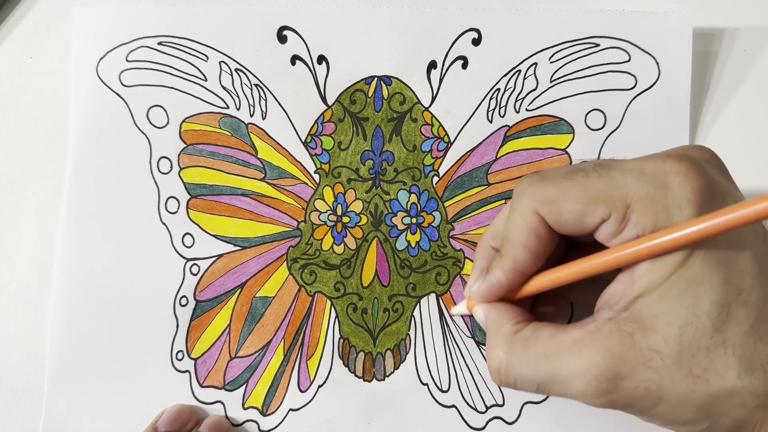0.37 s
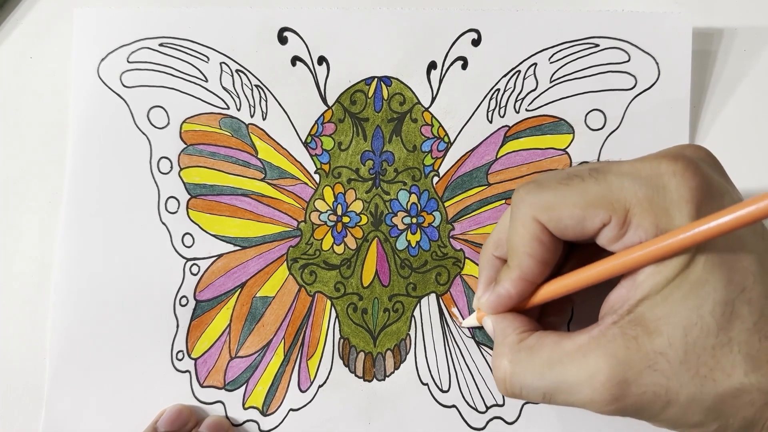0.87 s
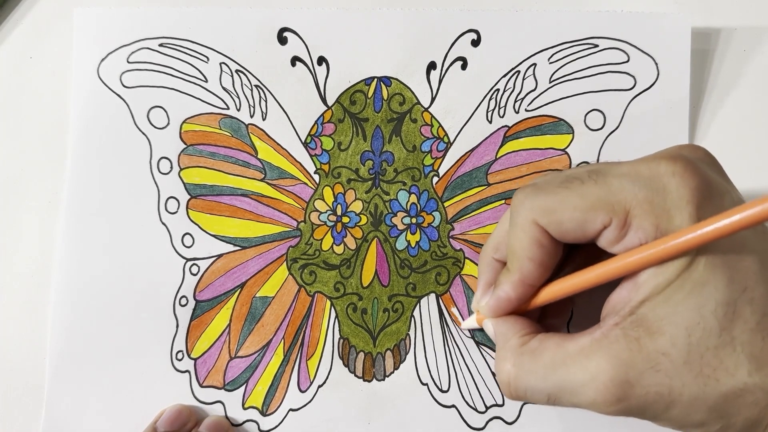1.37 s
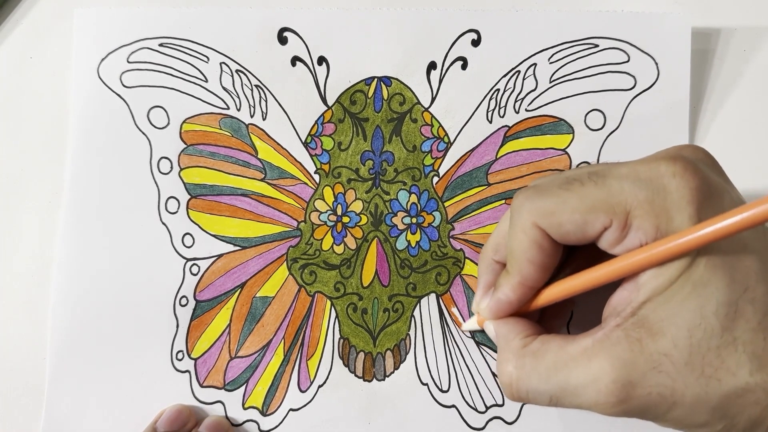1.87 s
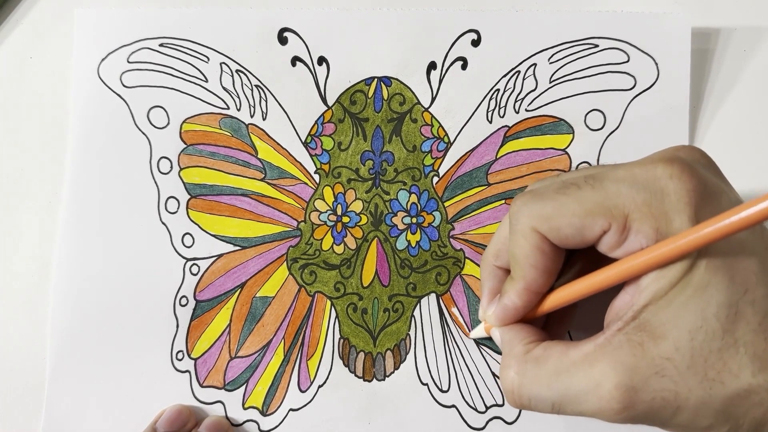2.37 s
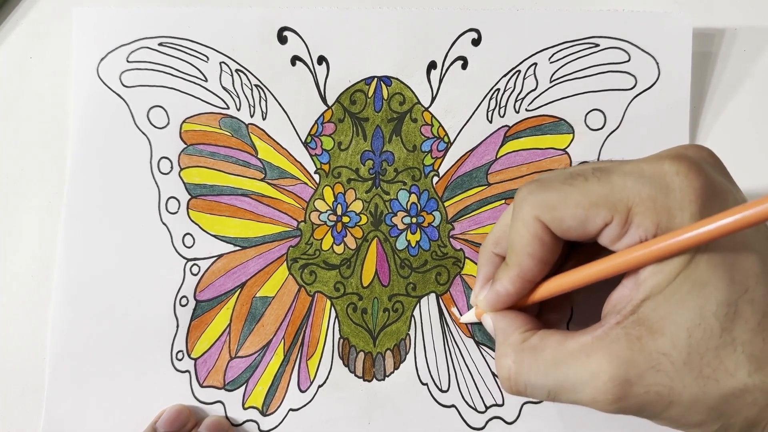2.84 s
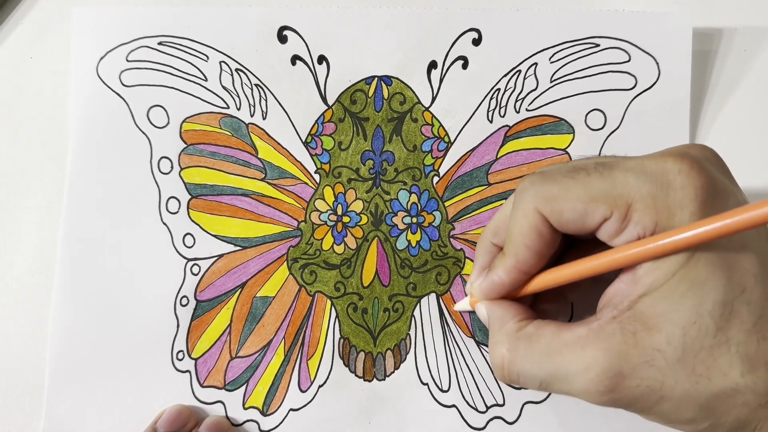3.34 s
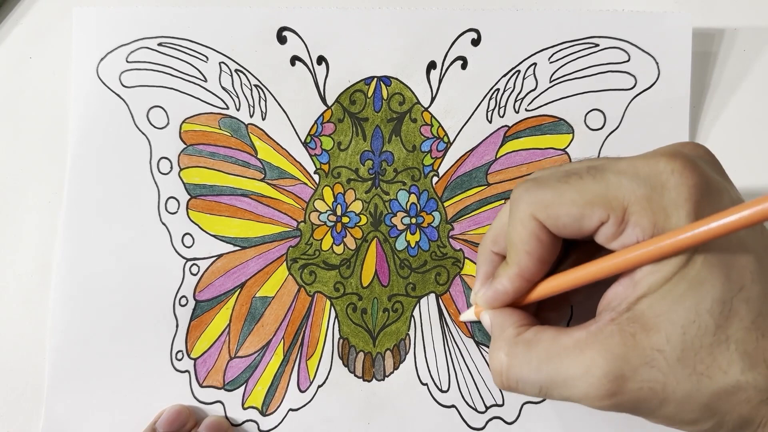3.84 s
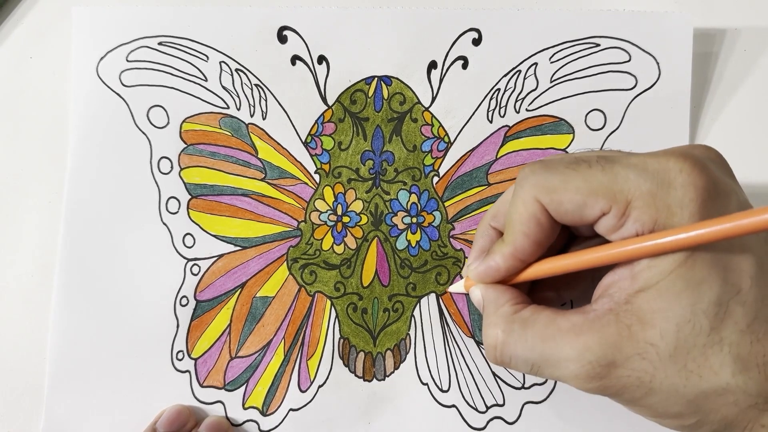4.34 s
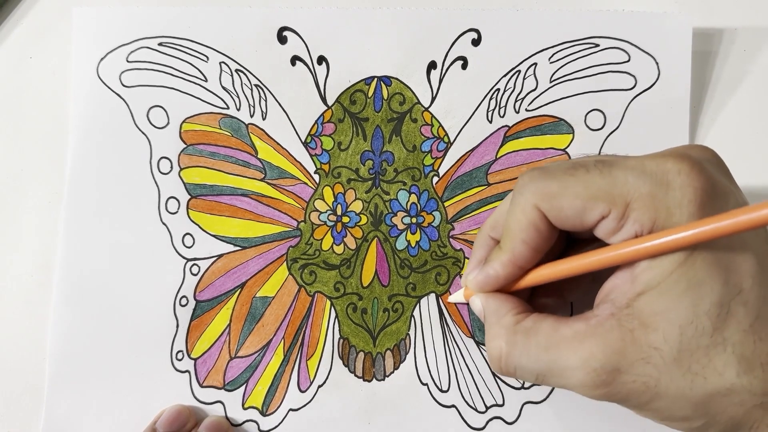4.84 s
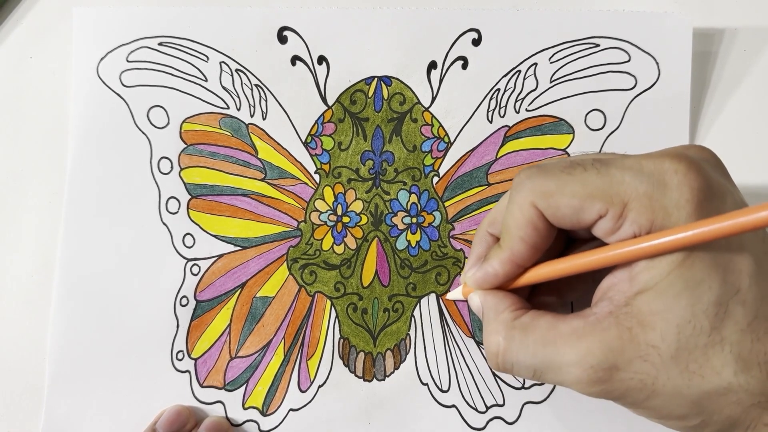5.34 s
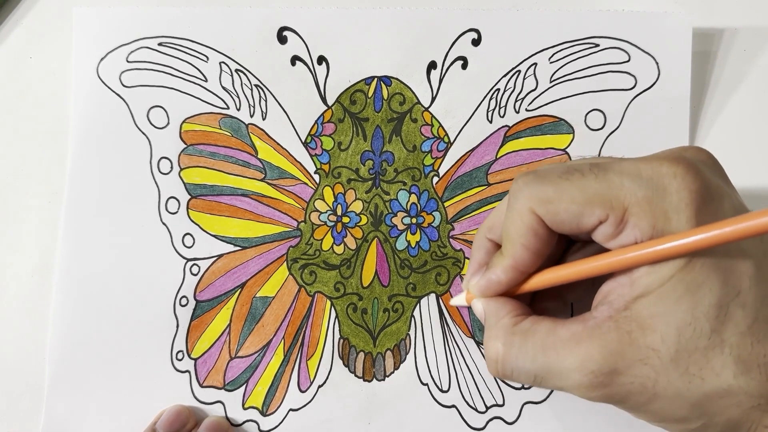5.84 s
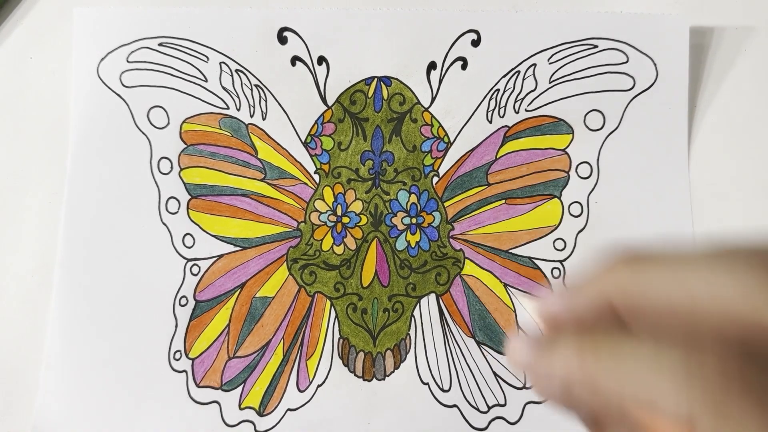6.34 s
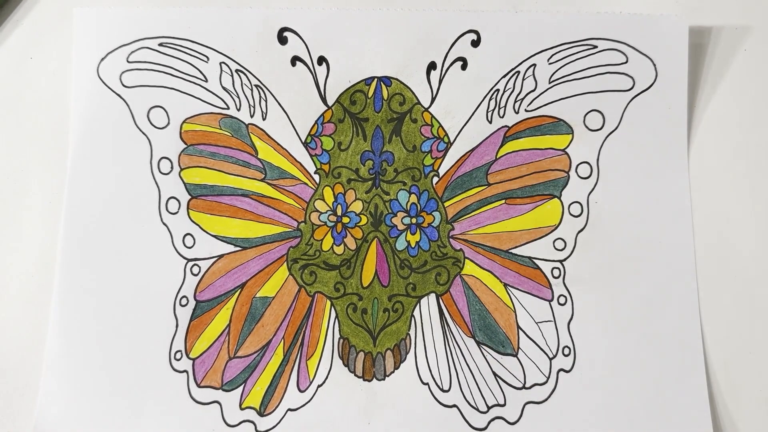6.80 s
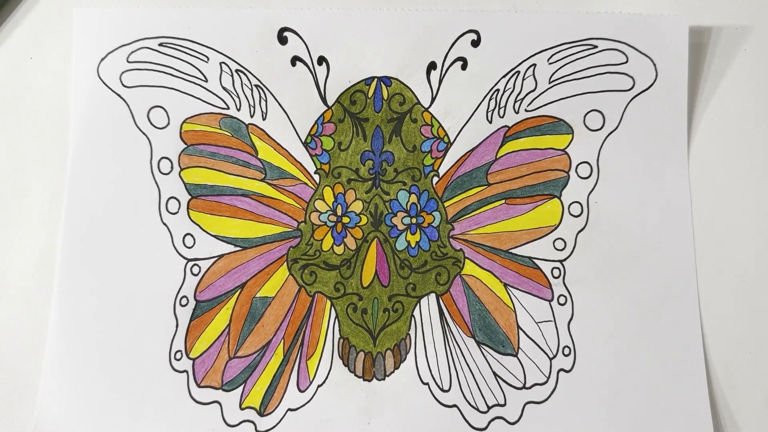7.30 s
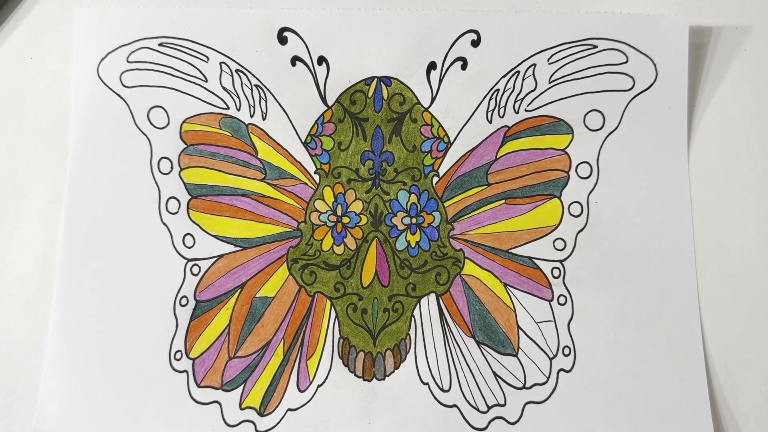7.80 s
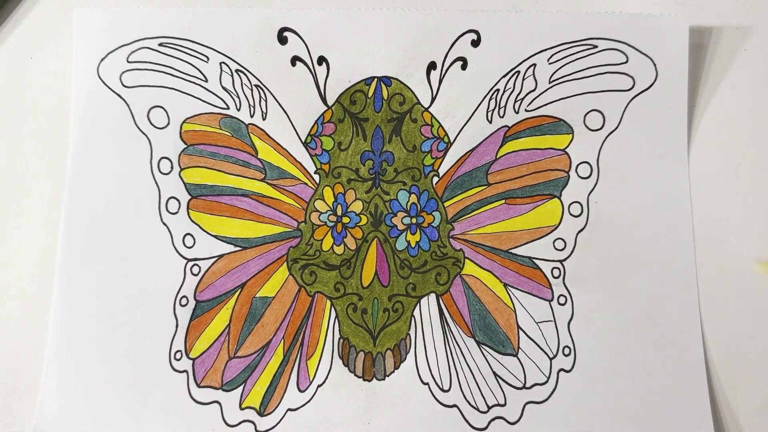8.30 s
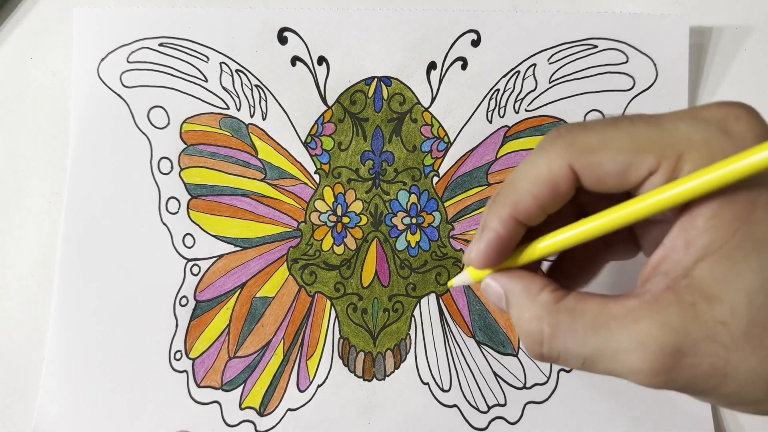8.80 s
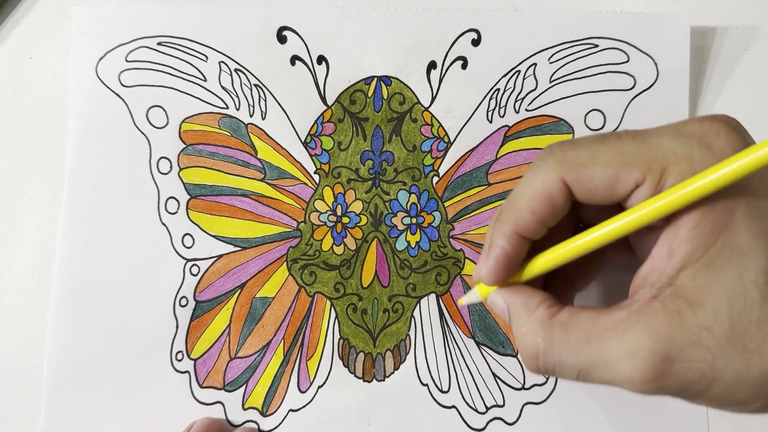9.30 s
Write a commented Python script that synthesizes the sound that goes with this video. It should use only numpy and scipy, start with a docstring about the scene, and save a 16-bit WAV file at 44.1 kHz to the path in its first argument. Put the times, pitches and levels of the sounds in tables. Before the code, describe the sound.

Quick scratchy pencil strokes on paper over a desk, heard close in stereo, fade after several seconds into light skin rustles and one short hard drag. A piercing hollow clack follows as a pencil lands among others, with a small rattling tail and room reflections. A second, slightly softer click and rattle comes as another pencil is taken. Small ticks and soft hand bumps end it, over faint low fan noise and drone.

```python
"""Coloured pencil on a desk

A coloured pencil shades back and forth on paper, close under a two-port phone microphone in a quiet room.
The hand lifts and scrapes the sheet, a pencil drops into a hollow holder, another is pulled out, the hand returns.
Hiss, brushes, bumps and rattles are shaped noise; clicks are fading modes over a crack of noise.
The walls answer with decaying noise reflections; behind lie fan noise, narrow hums and a low drone."""
import sys
import numpy as np
from scipy import signal
from scipy.fft import rfft, irfft, next_fast_len
from scipy.io import wavfile
from scipy.ndimage import uniform_filter1d

SR = 44100
rng = np.random.default_rng(int(sys.argv[2]) if len(sys.argv) > 2 else 0)


def put_to_file(sound):
    """Save the sound as 16-bit audio at rate SR, in the file named by the first command-line argument."""
    columns = np.atleast_2d(sound).T  # one column per channel
    safe = np.clip(columns, -1, 1)
    whole_steps = np.round(safe * 32767)
    wavfile.write(sys.argv[1], SR, whole_steps.astype(np.int16))


def nominal_scale(level):
    """Amplitude ratio for a level in decibels (scalar or array-like)."""
    x = np.asarray(level, float) / 20
    return 10 ** x


N = 415422
SIZE = next_fast_len(N + SR)
HZ = np.arange(SIZE // 2 + 1) * SR / SIZE + 1e-3
TIME = np.arange(N) / SR
PLUS_MINUS = np.array([[1], [-1]])


def shape(x, gain):
    """Filter by a gain for every frequency."""
    return irfft(rfft(x, SIZE) * gain, SIZE)[..., :N]


def unit(x):
    """Scale to rms 1."""
    return x / np.sqrt(np.mean(x ** 2))


def slope(points):
    """Values of (Hz, value) points joined on a log-frequency axis."""
    hz, value = np.transpose(points)
    return np.interp(np.log(HZ), np.log(hz + 1), value)


def peaks(modes):
    """Response of resonators side by side, each (Hz, width Hz, dB)."""
    return sum(nominal_scale(db) * 1j * HZ * w / (f * f - HZ ** 2 + 1j * HZ * w) for f, w, db in modes)


def bands(modes):
    """Gain of resonances whose powers add."""
    return np.sqrt(sum(np.abs(peaks([mode])) ** 2 for mode in modes))


def curve(rows):
    """Gain of a (s, dB) curve, silent outside its points."""
    s, db = np.transpose(rows)
    before = db[0] if s[0] <= 0 else -200
    return nominal_scale(np.interp(TIME, s, db, before, -200))


def ports(pair):
    """Left and right from a sound both share and one of opposite sign, power kept."""
    # sound of opposite sign at the two ports, against what both share: (frequency [Hz], level [dB])
    opposed = [(60, -25), (200, -17), (380, -6), (600, -1.5), (950, -2.5), (1250, -6), (1500, -4),
               (2000, -15), (2700, -5.5), (3600, -22), (4500, -4), (5400, -10), (6400, -8), (7900, -4),
               (9100, -14), (9800, -8), (11200, -26), (12500, -26), (14000, -9.5), (15000, -8),
               (15600, -14)]
    side = nominal_scale(slope(opposed))
    total = np.hypot(1, side)
    return shape(pair[0], 1 / total) + PLUS_MINUS * shape(pair[1], side / total)


def grit(scatter_db, patch_s, patch_db):
    """Fibres caught one by one: noise of uneven grain size, in rougher and smoother patches, at both ports."""
    patches = unit(uniform_filter1d(rng.standard_normal(N), max(int(patch_s * SR), 1)))
    grain_db = scatter_db * rng.exponential(size=N) + patch_db * patches
    return ports(rng.standard_normal((2, N)) * nominal_scale(grain_db))


def ring(hz, t60, length):
    """One fading mode."""
    t = np.arange(length) / SR
    return np.sin(2 * np.pi * hz * t) * 1000. ** (-t / t60)


def shading():
    """Each stroke speeds up and slows down; the lead hisses in the sheet, its colour changing, and rumbles in the desk."""
    # shading strokes: (time of top speed [s], time to reach it [s], hiss before chance changes [dB])
    strokes = [(0.023, .027, -50.5), (0.135, .036, -54), (0.273, .043, -49.9), (0.405, .025, -54.4),
               (0.565, .038, -55), (0.686, .023, -53.3), (0.841, .038, -52), (0.96, .023, -51),
               (1.105, .035, -54), (1.235, .032, -54.5), (1.393, .035, -54), (1.54, .026, -51.5),
               (1.665, .032, -56), (1.802, .021, -55.5), (1.923, .037, -55), (2.039, .019, -53.5),
               (2.162, .026, -57), (2.302, .014, -63), (2.401, .02, -56), (2.534, .032, -53.5),
               (2.653, .026, -53.8), (2.785, .032, -50), (2.936, .023, -55.5), (3.042, .028, -52),
               (3.109, .029, -62.5), (3.22, .026, -50), (3.345, .035, -49), (3.515, .029, -47.5),
               (3.62, .03, -50.5), (3.692, .031, -61), (3.844, .028, -50.5), (3.946, .031, -51),
               (4.016, .027, -64), (4.572, .015, -60), (4.635, .047, -54.5), (4.794, .032, -53.7),
               (4.978, .032, -49.5), (5.115, .037, -52), (5.46, .037, -66.5), (5.588, .029, -60.3),
               (5.861, .035, -61)]
    # the sheet under the lead, before sharpening: (frequency [Hz], width [Hz], level [dB])
    sheet_modes = [(3100, 500, -10.5), (3650, 400, -13), (5600, 700, -6), (7000, 500, -8), (7500, 400, -11),
                   (8600, 600, -6), (9250, 400, 0), (10400, 400, -6), (11700, 800, -.5), (12600, 300, -7),
                   (13100, 350, -3), (13600, 350, -3), (14300, 700, -4), (15150, 400, -6), (15650, 400, 0)]
    # the desk top: (frequency [Hz], width [Hz], level [dB])
    desk_modes = [(200, 600, -4.5), (688, 134, 7), (1180, 630, -23), (2300, 2400, -14)]
    # the desk rumbles less as the hand eases off: (time [s], rumble under a stroke of middling hiss [dB])
    rumble_level = [(0, -61), (2.1, -59), (2.7, -64), (3.1, -59.5), (3.6, -64), (5.1, -64), (5.5, -70),
                    (6.1, -63)]
    # centres of the bands that change level by chance: [Hz]
    hiss_bands_hz = [3300, 5500, 7400, 9200, 11700, 13800, 15600]
    middling_db, rumble_per_hiss = -54, .55  # dB of rumble gained per dB of hiss
    slowing = 1.02  # time to stop over time to speed up
    creep_db, creep_s = -17, .07  # the lead creeps on after a stroke: level, fading time
    colour_db, flicker_db, flicker_s = 2.1, 1.8, .008  # per band: chance from stroke to stroke, and flicker
    dip_hz, dip_width_hz, dip_depth = 4450, 1300, .55  # the desk echo cancels part of the hiss

    s, rise, hiss_db = np.transpose(strokes)[:, :, None]
    t = TIME - s
    span = np.where(t < 0, rise, rise * slowing)
    speed = np.exp(-np.abs(t / span).clip(0, 9) ** 2.6)
    speed = np.maximum(speed, nominal_scale(creep_db) * (t > 0) * np.exp(-t.clip(0) / creep_s))

    count = len(hiss_bands_hz)
    lean = rng.standard_normal((len(strokes), count))
    flicker = unit(uniform_filter1d(rng.standard_normal((count, N)), int(flicker_s * SR)))
    hiss = nominal_scale(hiss_db + colour_db * lean).T @ speed * nominal_scale(flicker_db * flicker)
    rumble = nominal_scale(rumble_per_hiss * (hiss_db[:, 0] - middling_db)) @ speed ** 0.62

    fibres = grit(scatter_db=1.7, patch_s=.005, patch_db=1.9)
    dip = 1 - dip_depth * np.exp(-((HZ - dip_hz) / dip_width_hz * 2) ** 2)
    share = np.array([np.interp(HZ, hiss_bands_hz, row) for row in np.eye(count)])
    parts = shape(fibres, bands(sheet_modes) ** 1.045 * dip * share[:, None])
    scale = np.sqrt(np.mean(parts.sum(0) ** 2))
    desk = unit(shape(fibres, bands(desk_modes) / (1 + (HZ / 3100) ** 6)))
    return (hiss[:, None] * parts).sum(0) / scale, rumble * curve(rumble_level) * desk


def hand():
    """Soft brushes of skin that swell and fade, each brighter or duller, and one hard drag."""
    # skin brushing the paper: (time of the peak [s], peak before tilt [dB], swell [dB/s], fade [dB/s],
    # tilt, added above 8.8 kHz and taken off below [dB])
    brushes = [(5.96, -66, 660, 400, -2), (6.1, -64.5, 110, 100, -1.5), (6.17, -58, 150, 400, 3.5),
               (6.335, -72, 210, 100, 5), (6.43, -65, 100, 170, -5), (6.72, -85, 60, 15, 6),
               (7.1, -76, 240, 600, -1), (7.53, -74, 130, 220, 8), (7.775, -75.5, 110, 600, -5),
               (8.07, -59.5, 290, 130, 2), (8.35, -76, 50, 110, 5), (8.5, -75.5, 65, 50, 4),
               (8.76, -69.5, 130, 20, -.6), (8.9, -70, 30, 55, .4), (9.03, -62.5, 330, 250, 0),
               (9.18, -63, 140, 95, -4)]
    # colour of skin on paper: (frequency [Hz], density [dB per Hz])
    skin_colour = [(300, -14), (1500, -12), (4300, -11), (5300, -4), (6700, -6), (9100, -9), (10600, 0),
                   (12500, -3), (14500, -7), (16000, -10)]
    # the fist drags hard over the sheet: (time [s], level [dB])
    drag_level = [(6.341, -53), (6.344, -38), (6.37, -39.5), (6.399, -38.5), (6.404, -42), (6.409, -52),
                  (6.5, -68)]
    # resonances under the drag: (frequency [Hz], width [Hz], level [dB])
    drag_modes = [(230, 120, 1.5), (450, 78, 0.5), (850, 400, -4), (1300, 400, 0.5), (2730, 260, -6),
                  (4600, 1600, -8.5), (6300, 650, -8), (7100, 740, -7), (9500, 450, -7), (10200, 720, -1.5),
                  (12600, 1800, -3), (15300, 1480, -15)]
    # the desk sings under the drag: (time [s], level [dB])
    sing_level = [(6.343, -53), (6.374, -48), (6.383, -42), (6.388, -45), (6.396, -39.5), (6.408, -58)]
    sing_hz, sing_width_hz = 1365, 150  # width before squaring narrows it

    skin = grit(scatter_db=1.4, patch_s=.008, patch_db=1.5)
    low = 1 / (1 + (HZ / 8800) ** 8)
    dull, bright = shape(skin, nominal_scale(slope(skin_colour)) * np.array([[low], [1 - low]]))
    scale = np.sqrt(np.mean((dull + bright) ** 2))
    power = 0
    for s, db, swell, fade, tilt_db in brushes:
        level_db = db - np.where(TIME < s, swell * (s - TIME), fade * (TIME - s))
        power = power + nominal_scale(level_db + tilt_db * PLUS_MINUS) ** 2
    brushing = (bright * np.sqrt(power[0]) + dull * np.sqrt(power[1])) / scale

    rough = grit(scatter_db=2.3, patch_s=.003, patch_db=2.8)
    drag = unit(shape(rough, bands(drag_modes))) * curve(drag_level)
    singing = unit(shape(rough, bands([(sing_hz, sing_width_hz, 0)]) ** 2)) * curve(sing_level)
    return brushing + drag + singing


def clicks():
    """Every click rings a set of modes over a short splintery crack; modes under 8 kHz shift from time to time."""
    # clicks and small ticks: (time [s], peak in the left channel [dB], tilt [dB per octave],
    # spread of the treble in the right channel [ms])
    knocks = [(6.2262, -45, -4, 0), (6.952, -44.5, -5.5, 0), (7.151, 6.5, 0.6, 5.2), (7.1543, -14, 3, 2.1),
              (7.159, -30, 3, 0), (7.1622, -26, 4, 0), (7.1678, -29, 4, 0), (7.7895, -26, -5, 0),
              (7.7914, -2.5, 5, 0), (7.7933, -14, 2.2, 0), (7.7983, -16.5, 0.1, 0), (7.803, -21, 0.6, 0),
              (7.8095, -27, 2.5, 0), (7.8215, -30, 1.5, 0), (7.831, -30, -1.5, 0),
              (8.0805, -34.5, 2.5, 1.6), (8.1075, -32, 1.5, 1.6), (8.227, -48.5, 3, 1.6),
              (8.3235, -51, -2.5, 1.6), (9.0125, -33.5, -1.5, 0), (9.098, -52, -2.2, 0),
              (9.205, -42, -1.5, 0)]
    # modes of a click, before pitch shift and tilt: (frequency [Hz], t60 [s], level [dB])
    click_modes = [(750, .006, -23), (2310, 0.02, -24), (2950, .008, -42), (4570, 0.0055, -14),
                   (4930, .007, -14), (6510, .007, -9), (7090, 0.007, 3), (7650, .0045, -0.5),
                   (9550, .005, 4.5), (10840, .004, 2), (12170, 0.006, 4), (13590, 0.0033, 0.5),
                   (15000, 0.003, -1.5), (16000, .002, -8)]
    # which modes ring, from this time on: (time [s], pitch factor under 8 kHz [ratio], extra level of the
    # 4.6 kHz mode [dB], extra level of the 5 kHz mode [dB], crack before tilt [dB], crack fading time [ms])
    voicings = [(0, .76, 0.1, 0, -2, 1.6), (6.9, .99, -2.5, 0.1, -9, 1.2), (7.5, .92, 9.5, -25, -12, 1.2),
                (8.05, 1.0, 1.5, 3, 1, 2.2), (9.05, .82, -6, 0, 0, 1.8)]
    # a hollow tone is stronger and out of step in the right channel: centre, added share
    hollow_hz, hollow_right = 2200, 1.8
    spread_db = -2.1  # level change of treble so spread

    out, length = np.zeros((2, N + SR)), SR // 20
    lead_in = length // 10
    t = np.arange(length) / SR
    hz = np.arange(length // 2 + 1) * SR / length
    treble = 1 / (1 + (5500 / (hz + 1)) ** 12)
    hollow = 1j * hollow_right / (1 + 1j * (hz - hollow_hz) / 450)
    noise = rng.standard_normal((len(knocks), 2, length + 1))
    for (s, db, tilt_db, spread_ms), (crack, scatter) in zip(knocks, noise):
        _, pitch, low_db, upper_db, crack_db, crack_ms = [row for row in voicings if row[0] <= s][-1]
        sound = 0
        for k, (f, t60, mode_db) in enumerate(click_modes):
            level_db = mode_db + tilt_db * np.log2(f / 7000) + low_db * (k == 3) + upper_db * (k == 4)
            mode = ring(f * (pitch if f < 8000 else 1), t60, length)
            sound = sound + (-1) ** k * nominal_scale(level_db) * mode  # neighbours start in opposite directions
        splinter = nominal_scale(crack_db + .9 * tilt_db) * np.diff(crack) * np.exp(-1000 * t / crack_ms)
        sound = (sound + splinter) * (1 - np.exp(-t / 0.00016))  # contact takes a moment
        sound = np.roll(sound * nominal_scale(db) / np.abs(sound).max(), lead_in)

        count = int(spread_ms * SR / 1000) + 1
        grains = scatter[1:count] * np.hanning(count + 1)[1:count] ** .4
        spread = np.r_[np.abs(scatter[0]), grains, np.zeros(length - count)]
        spread = np.roll(spread, -(2 * count // 3))
        spread = rfft(spread / np.sqrt(np.sum(spread ** 2))) * nominal_scale(spread_db * (count > 1))
        right = irfft(rfft(sound) * (1 - treble + treble * spread + hollow), length)
        i = int(s * SR) - lead_in
        out[:, i:i + length] += sound, right
    return out[:, :N]


def rattles():
    """Pencils jostle in the holder: dense small ticks that die away, loudest in one band over a broad skirt."""
    # after a knock or its rebound: (time [s], starting level [dB], t60 [s], centre of the loudest band [Hz],
    # its width before sharpening [Hz], centre of the band below [Hz])
    jostles = [(7.156, -41, .36, 7100, 900, 4600), (7.36, -57, .45, 6750, 600, 4300),
               (7.797, -41.5, .5, 6380, 750, 4300)]
    out = 0
    for s, db, t60, hz, width_hz, lower_hz in jostles:
        ticks = grit(scatter_db=2.4, patch_s=.004, patch_db=3.2)
        skirt = [(2350, 500, -6), (9000, 1400, -6), (13800, 5000, -9)]
        colour = bands([(hz, width_hz, 0), (lower_hz, 520, -4.5)] + skirt) ** 1.4
        fade = (TIME >= s) * 1000. ** (-(TIME - s).clip(0) / t60)
        out = out + nominal_scale(db) * unit(shape(ticks, colour)) * fade
    return out


def bumps():
    """Soft blows on the desk top: a first touch and a fading crackle, dulled to a wide band."""
    # rustling of knuckle or lead: (time [s], starting crackle level [dB], centre [Hz], t60 [s])
    blows = [(.871, -49, 680, 0.03), (.876, -48, 150, .25), (1.944, -46.5, 520, 0.06),
             (3.5, -49.5, 600, .06), (6.2258, -58, 2980, .06), (6.344, -47, 450, 0.4),
             (7.151, -36.5, 900, .03), (9.013, -54, 350, 0.25), (9.0135, -53, 1300, 0.14),
             (9.029, -59, 2800, 0.1), (9.192, -56, 1100, 0.25), (9.199, -52, 350, .25)]
    widest_hz = 1500  # before cubing narrows the band
    out = 0
    for s, db, hz, t60 in blows:
        crackle = unit(grit(scatter_db=2.5, patch_s=0.0036, patch_db=1.0))
        crackle[:, int(s * SR) + 20] = 8.7  # the first touch
        fade = (TIME >= s) * 1000. ** (-(TIME - s).clip(0) / t60)
        band = peaks([(hz, min(1.6 * hz, widest_hz), 0)]) ** 3
        out = out + nominal_scale(db) * shape(crackle * fade, band / np.sqrt(np.mean(np.abs(band) ** 2)))
    return out


def room(x):
    """A fading cloud of reflections, a few lingering bands, and a dull smeared slap from far off; partly alike at both ports."""
    # bands that ring on longest, before sharpening: (frequency [Hz], width [Hz], level [dB])
    linger = [(2350, 500, 7.5), (4300, 600, 3), (6600, 900, -1.5)]
    cloud_t60_s, cloud_db = 0.49, -25.5  # level before the early boost
    long_t60_s, long_db = 0.52, -25  # level before the lingering bands shape it
    slap_s, slap_db, slap_smear_s, slap_hz = .219, -34.5, .014, 14000  # a far wall returns the loud clicks

    t = np.arange(SR // 2) / SR
    early = (1 + 2.2 * np.exp(-t / .01)) * np.minimum(t / .003, 1)
    cloud = nominal_scale(cloud_db) * 1000. ** (-t / cloud_t60_s) * early
    slap = nominal_scale(slap_db) * np.exp(-np.abs(t - slap_s) / np.where(t < slap_s, .009, slap_smear_s))
    noise = rng.standard_normal((2, 2, len(t))) / np.sqrt(SR / 100)
    near, far = (ports(pair)[:, :len(t)] for pair in noise)
    late = nominal_scale(long_db) * 1000. ** (-t / long_t60_s) * np.minimum(t / .01, 1) * far[:, ::-1]
    middle = rfft(late + 2.4 * near[:, ::-1] * slap, SIZE) * bands(linger) ** 1.4
    dull_slap = rfft(far * slap, SIZE) / (1 + (HZ / slap_hz) ** 4)
    return shape(x, rfft(near * cloud, SIZE) + middle + dull_slap)


def air():
    """Fan noise with narrow humming bands that waver, partly alike at both ports, and a drone."""
    # broad noise, relative: (frequency [Hz], density [dB per Hz])
    air_colour = [(20, -36), (33, -28), (42, -7), (55, -3), (195, -3.5), (280, -13), (420, -20),
                  (800, -26.5), (1500, -25), (2300, -23), (3000, -36.5), (3600, -45.5), (5000, -48),
                  (9000, -46.5), (11500, -52), (13500, -47), (16000, -44.5)]
    # narrow bands of the fan and the room, before the swell: (frequency [Hz], width [Hz], level [dB])
    hums = [(44, 10, -61.5), (115, 10, -61.5), (150.8, 16, -64), (195, 25, -64), (234, 23, -65.5),
            (302.3, 13, -69), (362, 12, -75.5), (1150, 190, -75), (1960, 27, -67), (1920, 200, -66.5),
            (2128, 20, -75), (2470, 40, -78), (2902, 240, -81)]
    # low drone, before it wavers: (time [s], level [dB])
    drone_level = [(0.0, -64), (1.65, -66), (3.8, -70), (4.14, -54), (5.38, -73), (6.45, -60), (6.8, -66),
                   (7.37, -56.5), (7.74, -75), (8.13, -55), (9.42, -55.5)]
    air_db = -56.5  # broad noise before the swell
    drone_hz, drone_wander_hz, drone_waver_db = 63.94, 2.2, 3.2

    mid, side, drift, sway = rng.standard_normal((4, N))
    tone = nominal_scale(slope(air_colour))
    tone = tone * nominal_scale(air_db) / np.sqrt(np.mean(tone ** 2))
    # band powers add; each steep band is scaled up by its narrowness to reach its level
    for f, w, db in hums:
        tone = np.hypot(tone, nominal_scale(db) * np.abs(peaks([(f, 1.124 * w, 0)])) ** 2 * np.sqrt(SR / (2 * w)))
    hz = drone_hz + drone_wander_hz * unit(uniform_filter1d(drift, SR // 6))
    drone = np.sqrt(2) * np.sin(2 * np.pi * np.cumsum(hz) / SR) * curve(drone_level)
    waver = unit(uniform_filter1d(uniform_filter1d(drift[::-1], SR // 5), SR // 5))
    drone *= nominal_scale(drone_waver_db * waver)
    swell = nominal_scale(1.8 * unit(uniform_filter1d(uniform_filter1d(sway, SR // 12), SR // 12)))
    return swell * shape(ports([mid, side]), tone) + drone


def scene():
    """Everything on the desk sounds near; sheet and clicks return from the walls, over the fan."""
    hiss, rumble = shading()
    sheet, taps = hiss + hand(), clicks()
    walls = room(0.45 * sheet[0] + taps[0])
    return sheet + rumble + bumps() + taps + rattles() + walls + air()


def low_pass(x):
    """Removes everything above the highest recorded frequency."""
    return signal.sosfilt(signal.butter(12, 16830, fs=SR, output="sos"), x)


def record(dry):
    """Left and right differ in phase, nearly opposed near 11-13 kHz; the top is cut and peaks beyond full scale clip."""
    # phase between left and right: (frequency [Hz], lead of the left channel [rad])
    channel_phase = [(0, 0), (5000, 0.0), (7500, -1.6), (10000, -2.7), (10700, -3.05), (12900, -3.25),
                     (13700, -3.95), (16000, -4.85), (22000, -5)]
    top_hz = 15750
    lead = np.exp(1j * np.interp(HZ, *np.transpose(channel_phase)))
    heard = shape(dry, np.array([lead ** 0, 1 / lead]) / (1 + (HZ / top_hz) ** 300))
    return low_pass(np.clip(heard, -1, 1))


dry = scene()
out = record(dry)
put_to_file(out)
```